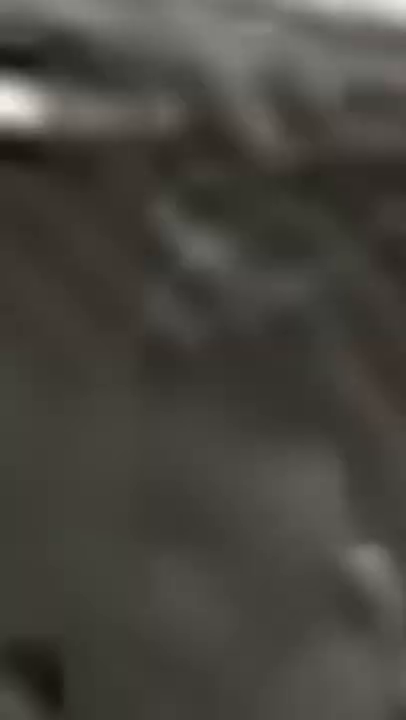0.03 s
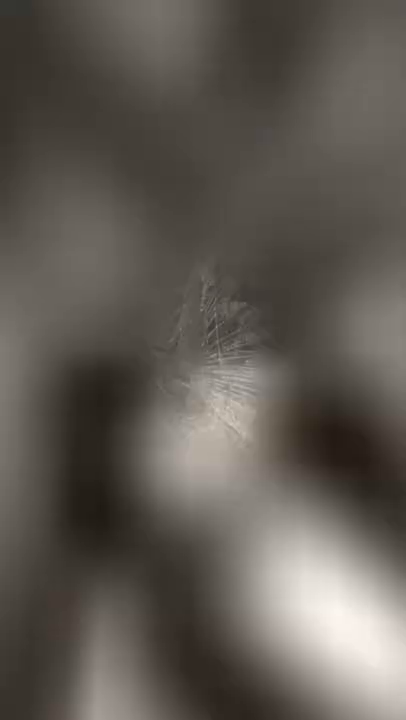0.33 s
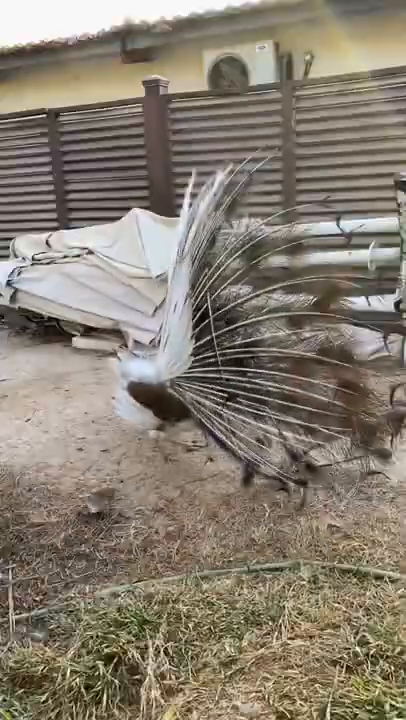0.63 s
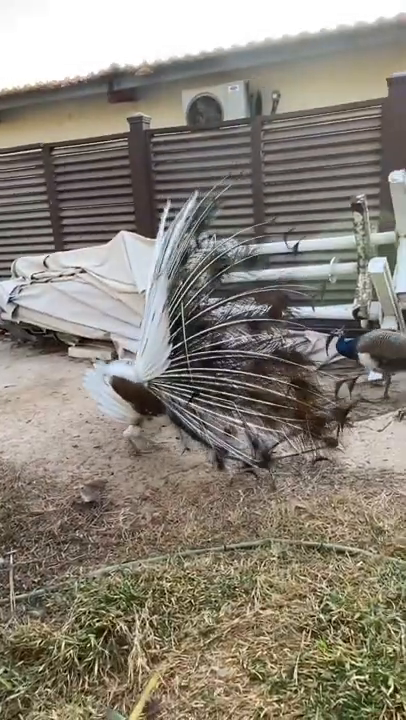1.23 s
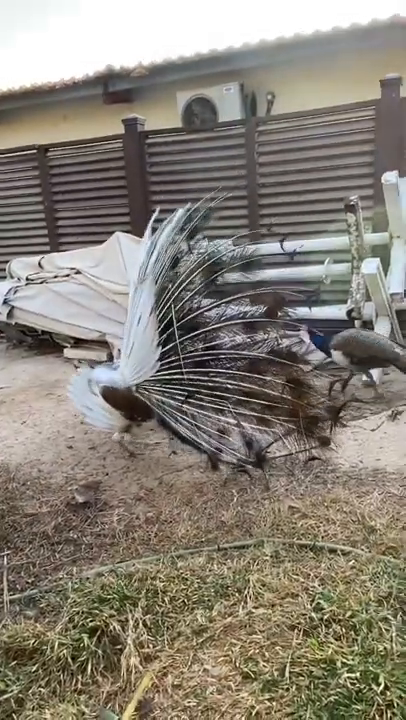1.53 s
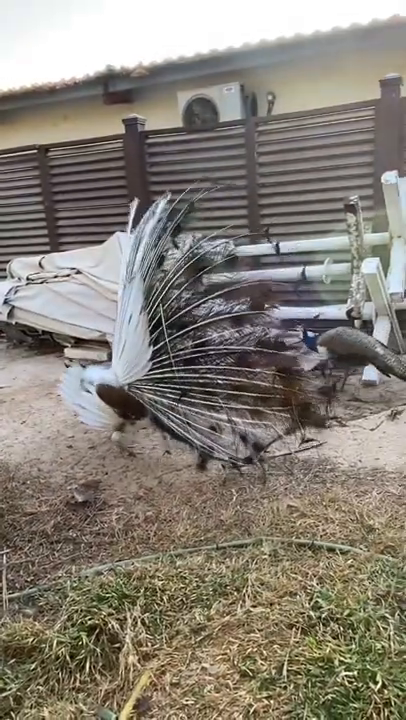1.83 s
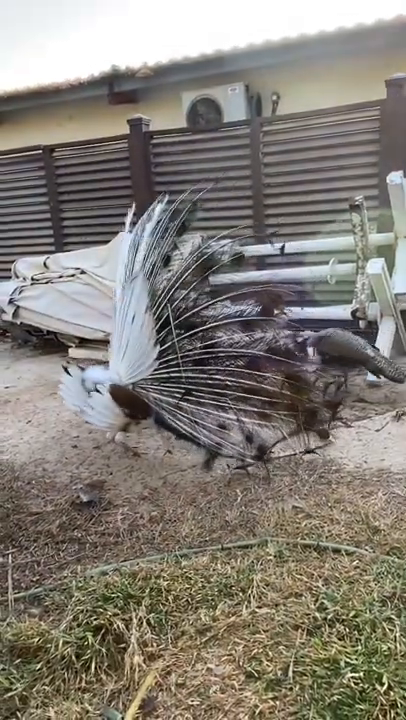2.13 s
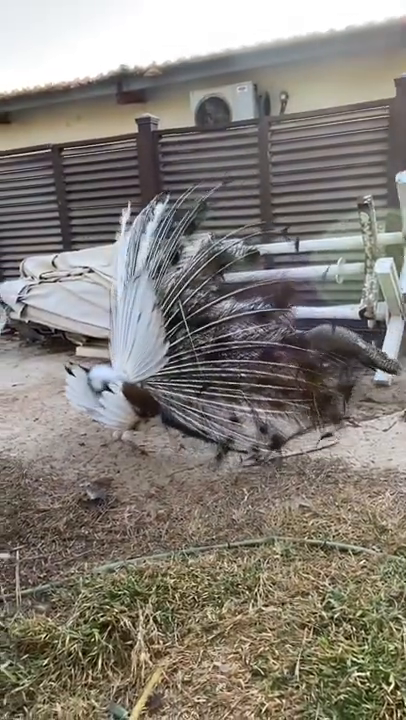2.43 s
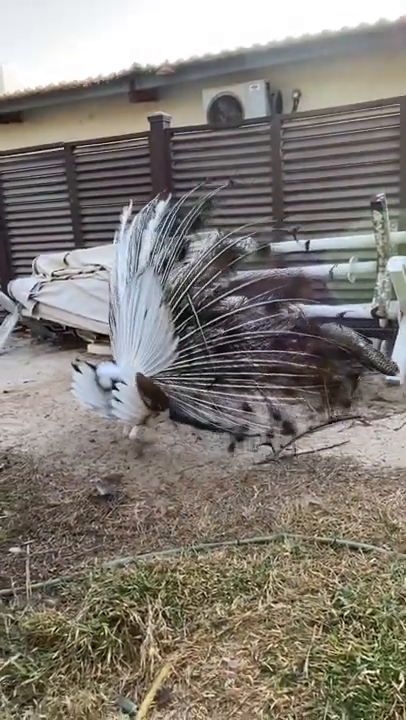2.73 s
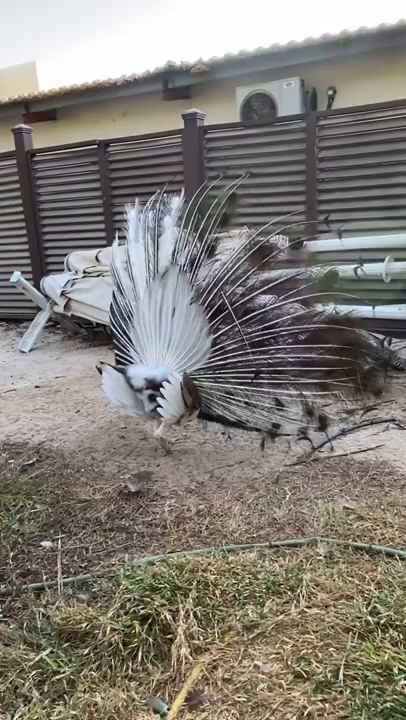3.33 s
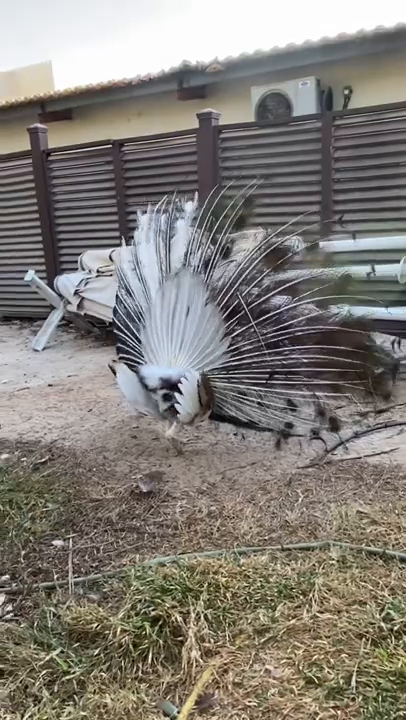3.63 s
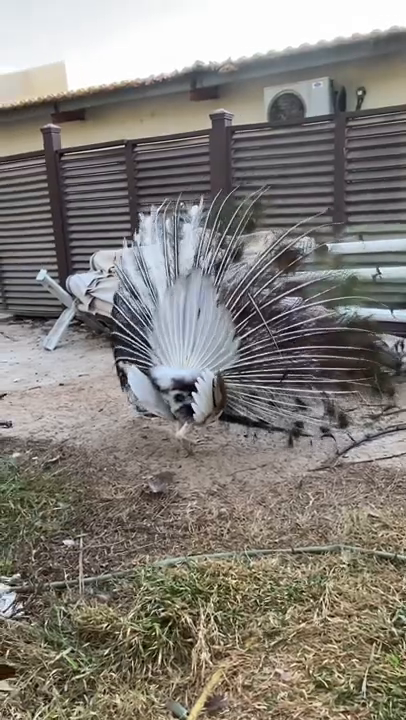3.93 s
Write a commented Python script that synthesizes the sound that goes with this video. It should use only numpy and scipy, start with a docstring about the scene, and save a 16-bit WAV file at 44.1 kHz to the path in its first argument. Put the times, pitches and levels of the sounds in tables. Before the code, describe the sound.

Peacock tail quills rattle and hiss in a yard, following breeze, crackles and birdsong.

```python
"""A fenced yard: a peacock turns with its train raised, feathers brushing, then shivers it, and the
quills tap together in a rattle that swells into a hiss. Behind it an air conditioner drones, a small
bird whistles, another chips and fowl call far off, echoing from the fence and house wall.
The opening is louder, with breeze, dry crackles and one buzzy bird call, and cuts off abruptly."""
import sys
import numpy as np
from scipy import signal
from scipy.fft import rfft, irfft, next_fast_len
from scipy.io import wavfile
from scipy.ndimage import map_coordinates

SR = 44100
rng = np.random.default_rng(int(sys.argv[2]) if len(sys.argv) > 2 else 0)


def pcm_store(signal):
    """Save signal as 16-bit PCM."""
    levels = np.round(np.clip(np.atleast_2d(signal), -1, 1) * 32767)
    wavfile.write(sys.argv[1], SR, levels.astype(np.int16).T)


N = 176400


def amp(db):
    """Decibels to gain."""
    return 10 ** (np.asarray(db) / 20)

def unit(x):
    """Scale to rms 1."""
    return x / np.sqrt(np.mean(x ** 2) + 1e-20)

def clock():
    """Time of each sample in seconds."""
    return np.arange(N) / SR

def fader(rows):
    """Gain per sample from (time_s, level_db) points."""
    return amp(np.interp(clock(), *np.transpose(rows)))

def curve(points, hz):
    """Read (freq_hz, value) points along a log frequency axis."""
    freqs, values = np.transpose(points)
    return np.interp(np.log(hz + 1), np.log(freqs + 1), values)

def wobble(per_s):
    """Smooth random modulation through per_s points a second."""
    return map_coordinates(rng.standard_normal(4096), [clock() * per_s], mode="wrap")

def filtered(x, response):
    """Shape x with a frequency response."""
    size = next_fast_len(N + SR // 2)
    return irfft(rfft(x, size) * response(np.fft.rfftfreq(size, 1 / SR)), size)[..., :N]

def white():
    """Two unrelated white noises."""
    return rng.standard_normal((2, N))

def band(hz, width_hz):
    """A band of noise at rms 1."""
    return unit(filtered(rng.standard_normal(N), lambda f: 1 / (1 + (2 * (f - hz) / width_hz) ** 4)))

def taps(per_s):
    """Two streams of tiny random impacts, uneven in strength."""
    hits = rng.random((2, N)) < per_s / SR
    return unit(hits * np.sign(white()) * amp(-1.5 * white()))

def add(out, start_s, x):
    """Mix x in at start_s."""
    i = max(0, round(start_s * SR))
    out[i:i + len(x)] += x[:max(0, N - i)]

def swell(start_s, length_s):
    """A half-sine fade in and out."""
    return np.sin(np.pi * np.clip((clock() - start_s) / length_s, 0, 1))

def echo(x, t60_s):
    """Diffuse stereo answer of the fence and house wall."""
    t = np.arange(SR // 2) / SR
    tail = rng.standard_normal((2, len(t))) * amp(-60 * t / t60_s) * (t > .004)
    return signal.fftconvolve(x[None], tail / np.linalg.norm(tail[0]), axes=1)[:, :N]

def opening(cut_s=.657, fade_s=.0032):
    """Gate for the loud opening: 1 before the cut, 0 after it."""
    return np.clip((cut_s - clock()) / fade_s + .5, 0, 1)

def phase_split(lead, hz):
    """Response that puts the left channel ahead of the right by the lead curve."""
    return np.exp(1j * np.outer([.5, -.5], curve(lead, hz)))

# Stereo width of the noise layers: freq_hz, side_minus_mid_db
WIDTH = [(100, -25), (200, -17), (450, -7), (2000, -6), (5000, -9), (7000, -15), (15500, -15)]

def stereo(pair, eq, pan, lead):
    """EQ two unrelated signals as mid and side, then place them by balance and phase, at rms 1."""
    mid, side = filtered(pair, lambda hz: amp(curve(eq, hz) + np.outer([0, 1], curve(WIDTH, hz))))
    place = lambda hz: amp(np.outer([.5, -.5], curve(pan, hz))) * phase_split(lead, hz)
    return unit(filtered(np.array([mid + side, mid - side]), place))


# Tone of the outdoor bed: freq_hz, gain_db
AIR_EQ = [(80, -17), (200, -1.5), (330, 0), (550, -3), (700, -2.5), (1100, -11), (2000, -14.5), (3100, -18),
          (4800, -22), (6500, -31.5), (10000, -95), (15500, -57)]
# Balance of air, breeze and rumble: freq_hz, left_minus_right_db
YARD_BALANCE = [(60, 1.5), (180, 3), (450, 5.5), (1650, 2), (5000, -0.5)]
# Phase image of the air and the feather brush: freq_hz, left_lead_rad
YARD_PHASE = [(220, 0), (500, -1.78), (1100, -2), (2000, -1.5), (2800, -2.5), (3900, -4.5), (4900, -4),
              (6000, -11)]

def air(level_db=-56.5):
    """A nearly steady bed of outdoor air."""
    return amp(level_db + .51 * wobble(5.15)) * stereo(white(), AIR_EQ, YARD_BALANCE, YARD_PHASE)

# Rise of the murmur: time_s, level_db
MURMUR_FADER = [(.7, -85), (1, -81), (1.2, -77), (1.5, -88), (1.75, -71), (1.9, -74), (2.1, -66.5),
                (2.4, -63.5), (2.6, -64.5), (2.8, -67), (2.95, -60), (3.3, -59)]

def murmur():
    """A distant midrange murmur, heard only as echo."""
    return fader(MURMUR_FADER) * echo(band(1540, width_hz=1200), t60_s=.075)

# Rides on the breeze's body and its hiss: time_s, level_db
BREEZE_FADER = [(0, -45), (.1, -47.5), (.22, -46.5), (.4, -46), (.52, -45), (.66, -45)]
HISS_FADER = [(0, -58.5), (.2, -63), (.32, -55), (.5, -56.5), (.66, -59.5)]
# Tone of the body and the hiss: freq_hz, gain_db
BREEZE_EQ = [(60, -7.5), (150, 6), (300, -4), (550, -3.5), (850, -4.5), (1300, -10.5), (2200, -14.5),
             (3500, -34.5), (8000, -36)]
HISS_EQ = [(800, -17), (2500, 1), (4000, 0.5), (6200, -4.5), (8000, -6.5), (10500, -5.5), (13000, -14.5),
           (15500, -14.5)]
# Phase image of the breeze and the rumble: freq_hz, left_lead_rad
BREEZE_PHASE = [(220, 0), (500, -.6), (1200, -.7), (1700, 0), (4000, 0), (4400, .9), (5000, 0)]

def breeze():
    """Moving air in the opening: a fluttering low body with hiss on top."""
    flutter = amp(.85 * wobble(71.1))
    body = fader(BREEZE_FADER) * flutter * stereo(white(), BREEZE_EQ, YARD_BALANCE, BREEZE_PHASE)
    hiss = fader(HISS_FADER) * stereo(white(), HISS_EQ, YARD_BALANCE, BREEZE_PHASE)
    return opening() * (body + hiss)

# Tone of the machine's rumble: freq_hz, gain_db
RUMBLE_EQ = [(20, -25.5), (31, -20.5), (44, -1), (65, 2), (100, -6.5), (140, -7), (185, -18.5), (300, -31),
             (600, -96)]
# Ride on drone and rumble after the cut: time_s, gain_db
BASS_FADER = [(.7, 1), (1.3, -1), (1.7, 1), (2.2, -0.5), (2.6, 1.5), (2.95, -0.5), (3.3, -3), (3.6, 0.5),
              (4, -3)]

def air_conditioner(drone_hz=88.75, loud_db=-35.5, soft_db=-44, rumble_db=-43, fan_db=-72.5):
    """A wavering drone over low rumble; at the cut the drone drops and a faint fan tone joins."""
    hum = np.sin(2 * np.pi * np.cumsum(drone_hz + 2.46 * wobble(14)) / SR)
    loud = amp(loud_db) * unit(hum * amp(1.6 * wobble(25)))
    soft = amp(soft_db) * unit(hum * amp(2.8 * wobble(12)) + .55 * band(drone_hz, width_hz=5.3))
    rumble = amp(rumble_db) * stereo(white(), RUMBLE_EQ, YARD_BALANCE, BREEZE_PHASE)
    fan = amp(fan_db) * band(525.7, width_hz=17)
    after_cut = fader(BASS_FADER) * (soft + rumble) + fan
    return opening() * (loud + rumble) + (1 - opening()) * after_cut

# Far-off calls: start_s, length_s, level_db, centre_hz, width_hz
FOWL_CALLS = [(1.02, .3, -71, 1560, 190), (1.15, .2, -69, 1490, 200), (1.034, .19, -72.5, 1860, 300),
              (1.567, .056, -76, 2710, 200), (1.844, .039, -74, 2250, 120), (1.97, .22, -72.5, 1890, 220),
              (2.275, .23, -69, 1420, 260), (2.286, .18, -66.5, 950, 150), (2.296, .22, -71, 1980, 244),
              (2.43, .18, -71, 2410, 484), (2.68, .13, -68, 1420, 220)]

def far_fowl():
    """Distance blurs each call into a soft swell of narrow noise, more echo than direct sound."""
    calls = sum(amp(db) * swell(start_s, length_s) * band(hz, width_hz)
                for start_s, length_s, db, hz, width_hz in FOWL_CALLS)
    return amp(1) * calls + amp(3) * echo(calls, t60_s=.53)

# Short chips: start_s, level_db
CHIP_CUES = [(.753, -69), (.775, -72), (.872, -72), (1.283, -71), (1.397, -73), (1.49, -68), (1.602, -69),
             (2.812, -69.5), (2.94, -60.5)]

def chipping_bird(length_s=.015):
    """A farther bird's chips arrive as bright, blurred ticks."""
    envelope = sum(amp(db) * swell(start_s, length_s) for start_s, db in CHIP_CUES)
    chips = envelope * band(5000, width_hz=1900)
    return amp(.5) * chips + amp(1.5) * echo(chips, t60_s=.15)

# Whistled notes: start_s, length_s, level_db, start_hz, one_third_hz, two_thirds_hz, end_hz
SONG_NOTES = [(1.731, .045, -65, 4300, 4550, 4850, 5150), (1.772, .041, -57.5, 5300, 5700, 4950, 3600),
              (1.897, .028, -62, 4550, 4800, 5000, 5150), (1.92, .04, -56.5, 5050, 5400, 5430, 5300),
              (1.958, .044, -57.5, 5300, 5150, 5000, 4200), (2.108, .04, -71, 4200, 4350, 4450, 4600),
              (2.157, .05, -62.5, 5650, 5500, 4750, 3600), (2.297, .088, -61.5, 3550, 4050, 4430, 4300),
              (2.349, .016, -61, 4300, 4600, 5200, 5900), (2.372, .068, -56.5, 5750, 5220, 5450, 6200),
              (2.524, .085, -62, 3520, 3780, 4060, 4400), (2.578, .018, -61, 4200, 4500, 5100, 5700),
              (2.584, .082, -56.5, 5550, 5250, 5350, 6050)]

def whistling_bird(trim_db=-.3, flicker_db=2.5):
    """A small bird slurs thin tones through four pitches each; the fence slats scatter them."""
    song, waver = np.zeros(N), 1 + .014 * wobble(350)
    for start_s, length_s, db, *pitches in SONG_NOTES:
        progress = np.linspace(0, 1, int(length_s * SR))
        glide_hz = np.polyval(np.polyfit(np.linspace(0, 1, 4), pitches, 3), progress)
        phase = 2 * np.pi * np.cumsum(glide_hz * waver[int(start_s * SR):][:len(progress)]) / SR
        envelope = np.sqrt(np.abs(np.sin(np.pi * progress)))
        add(song, start_s, amp(db) * envelope * np.sin(phase))
    song *= amp(trim_db + flicker_db * wobble(120))
    scatter = amp(-5.5) * echo(song, t60_s=.06)
    return song + scatter + amp(-2) * echo(song, t60_s=.32)

# Throat resonances: freq_hz, gain_db, t60_s
THROAT_MODES = [(1302, -15, 0.033), (1835, 2, 0.02), (2166, -7, 0.017), (2650, -15, 0.013)]

def buzzing_bird(start_s=.45, rise_s=.033, pulse_hz=79.85, jitter_s=.00008, level_db=-46.5, rasp=.38):
    """Fast, even pulses ring a bird's throat, with a noisy rasp mixed in, until the cut."""
    pulses, t = np.zeros(N), np.arange(SR // 25) / SR
    for k, (slip, strength) in enumerate(rng.standard_normal((20, 2))):
        add(pulses, start_s + k / pulse_hz + jitter_s * slip, amp([.31 * strength]))
    ring = sum(amp(db - 60 * t / t60_s) * np.sin(2 * np.pi * hz * t) for hz, db, t60_s in THROAT_MODES)
    ring *= 1 - np.exp(-t / .0049)  # softens each pulse's attack
    ring /= np.sqrt(np.sum(ring ** 2) * pulse_hz / SR)
    buzz = signal.fftconvolve(pulses, ring)[:N]
    voice = np.sqrt(1 - rasp ** 2) * buzz + rasp * band(1920, width_hz=520)
    voice *= amp(level_db) * np.clip((clock() - start_s) / rise_s, 0, 1)
    return opening() * (voice * amp([[-.5], [.5]]) + amp(-4) * echo(voice, t60_s=.14))

# A run of snaps in the opening, then two faint high ticks: start_s, level_db, centre_hz
CRACKLE_CUES = [(.039, -31.5, 1200), (.066, -32.5, 900), (.089, -34, 800), (.107, -37, 1500),
                (.131, -30.5, 1000), (.154, -37, 1300), (.177, -33, 1300), (.199, -30.5, 1100),
                (.221, -33.5, 1200), (.243, -34, 1100), (.264, -32.5, 1000), (.286, -33, 900),
                (.307, -34.5, 1700), (.33, -27, 1400), (.355, -34, 1100), (.381, -33, 800),
                (1.105, -61.5, 11000), (1.728, -49.5, 8000)]

def crackles(knock_t60_s=.0035, tail_t60_s=.016, tail_db=-14):
    """Short dry snaps, a little to the left: a heavily damped knock and a trace of noise."""
    out, t = np.zeros(N), np.arange(SR // 20) / SR
    for start_s, db, hz in CRACKLE_CUES:
        knock = np.sin(2 * np.pi * hz * t) * amp(-60 * t / knock_t60_s)
        tail = band(hz, 1.5 * hz)[:len(t)] * amp(tail_db - 60 * t / tail_t60_s)
        add(out, start_s, amp(db) * (knock + tail))
    return out * amp([[1.5], [-1.5]])

# Feather strokes as the bird turns: time_s, level_db
BRUSH_FADER = [(.66, -82), (.73, -82), (.765, -74), (.84, -83), (1.05, -85.5), (1.2, -79), (1.42, -78.5),
               (1.51, -75), (1.62, -80), (1.735, -79), (1.762, -67), (1.8, -79), (1.87, -91), (2.01, -87),
               (2.08, -76.5), (2.16, -83), (2.3, -90), (2.56, -90), (2.68, -84), (2.72, -77.5), (2.8, -87),
               (3, -88)]
# Their airy tone: freq_hz, gain_db
BRUSH_EQ = [(1000, -67), (3000, -1), (5000, -2), (7000, -6), (9000, 2), (11500, 4), (13500, -2),
            (15500, -2)]
# Balance of the train, for brush and rattle: freq_hz, left_minus_right_db
TRAIN_BALANCE = [(300, -1.4), (1650, -3), (5000, -0.8), (12000, 1)]

def feather_brush(waver_db=1.5):
    """Feathers slide over each other in a fine, high grain as the peacock turns."""
    grain = taps(per_s=2000) + .29 * white()
    brush = stereo(grain, BRUSH_EQ, TRAIN_BALANCE, YARD_PHASE)
    return fader(BRUSH_FADER) * amp(waver_db * wobble(25)) * brush

# Build of the shiver: time_s, level_db
SHIVER_FADER = [(2.55, -100), (2.8, -78.5), (2.9, -65), (3.04, -55), (3.14, -51.5), (3.24, -49),
                (3.35, -46), (3.6, -45), (3.82, -45.5), (4, -44)]
# Quill resonances and one notch: freq_hz, width_hz, gain_db
SHAFT_MODES = [(1640, 37, 1), (2290, 140, 2), (2560, 24, 7), (2980, 26, 8.5), (3560, 37, 4),
               (4250, 27, -11.5), (4800, 92, 0), (4900, 51, 3.5), (5600, 36, 7)]
# Overall tone of the rattle: freq_hz, gain_db
RATTLE_EQ = [(120, -8), (200, 4), (350, 0), (550, 0), (1100, -1.5), (1700, -.5), (2200, -1), (2900, 1),
             (3700, 1), (4500, -1.5), (5300, -2.5), (6500, -3.5), (8000, -7), (10500, -8), (12800, -9.5),
             (15500, -11)]
# Phase image of the rattle: freq_hz, left_lead_rad
RATTLE_PHASE = [(220, 0), (800, -1.5), (1400, -4.6), (1700, -6.1), (2150, -6.4), (2900, -9.5),
                (3600, -11.2), (4400, -11.6), (5100, -12.5)]

def train_shiver(shake_hz=25.3, tap_depth=.21, swing_depth=.13, waver_db=.7):
    """Quills tap each other at both ends of every shake, so the hiss pulses at twice the shake rate."""
    phase = 2 * np.pi * np.cumsum(shake_hz + .5 * wobble(3.93)) / SR
    shake = 1 + tap_depth * np.cos(2 * phase) + swing_depth * np.cos(phase)
    shake *= amp(waver_db * wobble(15))
    contacts = taps(per_s=5000) + 1.83 * white()
    shafts = lambda f: amp(sum(db / (1 + (2 * (f - hz) / width) ** 2) for hz, width, db in SHAFT_MODES))
    rattle = stereo(filtered(contacts, shafts), RATTLE_EQ, TRAIN_BALANCE, RATTLE_PHASE)
    return fader(SHIVER_FADER) * shake * rattle


def scene():
    """The yard's bed, the peacock, the crackles and the other birds, mixed in stereo."""
    bed = air_conditioner() + air() + breeze() + murmur()
    peacock = train_shiver() + feather_brush()
    return bed + peacock + crackles() + buzzing_bird() + whistling_bird() + chipping_bird() + far_fowl()

# Phase between the microphone ports: freq_hz, left_lead_rad
MIC_PHASE = [(5200, 0), (6000, 1.55), (7000, 3.05), (8000, 3.3), (9000, 4.9), (9900, 6.2), (11400, 6.4),
             (12000, 7.8), (13000, 9.3), (14300, 9.6), (15700, 12.1)]

def record(dry, top_hz=15750):
    """The two microphone ports drift apart in phase in the treble; nothing passes above top_hz."""
    return filtered(dry, lambda hz: phase_split(MIC_PHASE, hz) * (hz < top_hz))


dry = scene()
out = record(dry)
pcm_store(out)
```